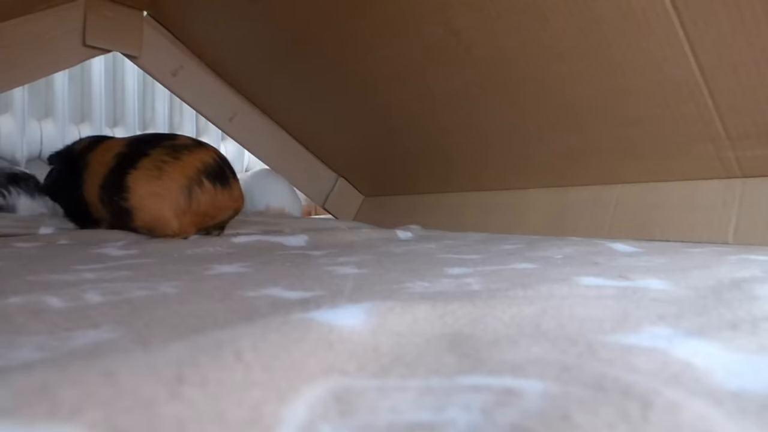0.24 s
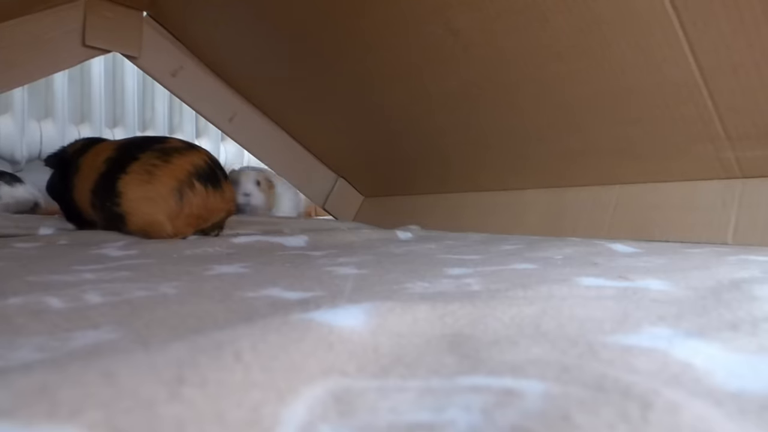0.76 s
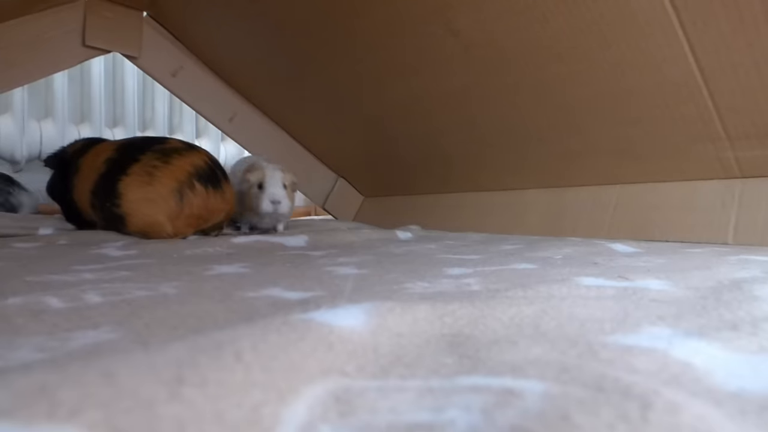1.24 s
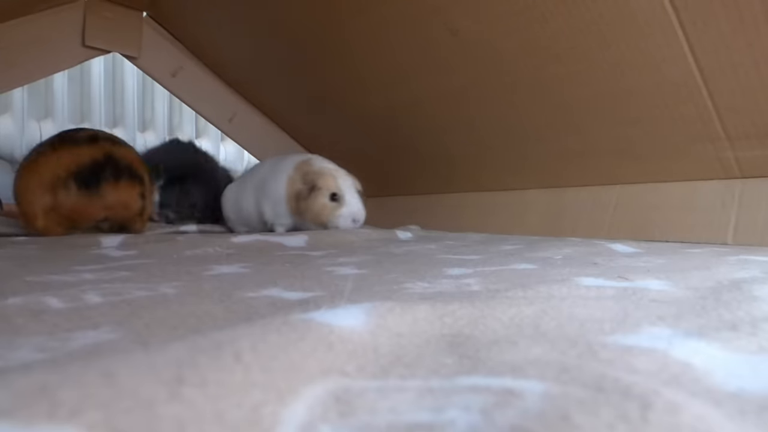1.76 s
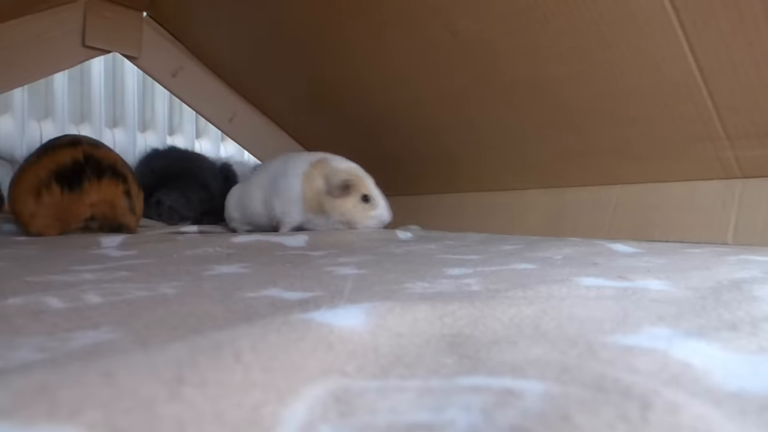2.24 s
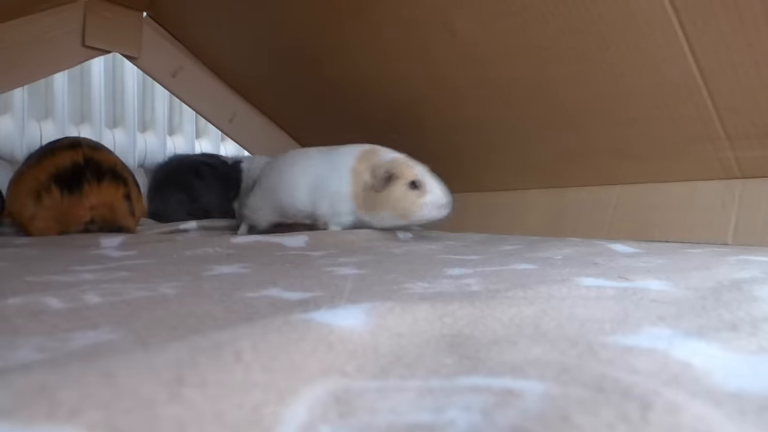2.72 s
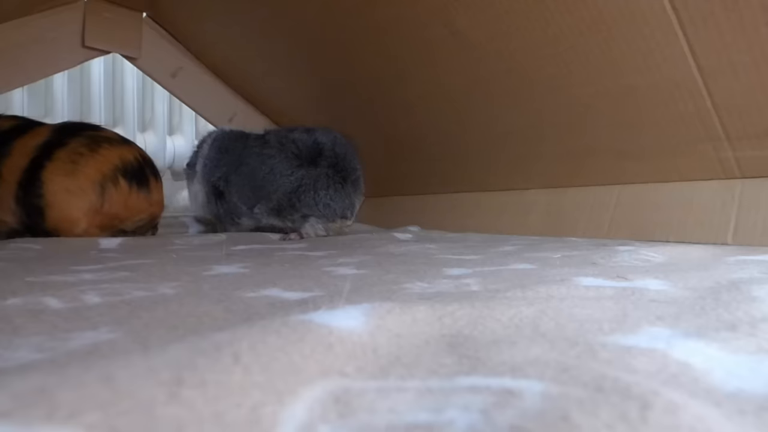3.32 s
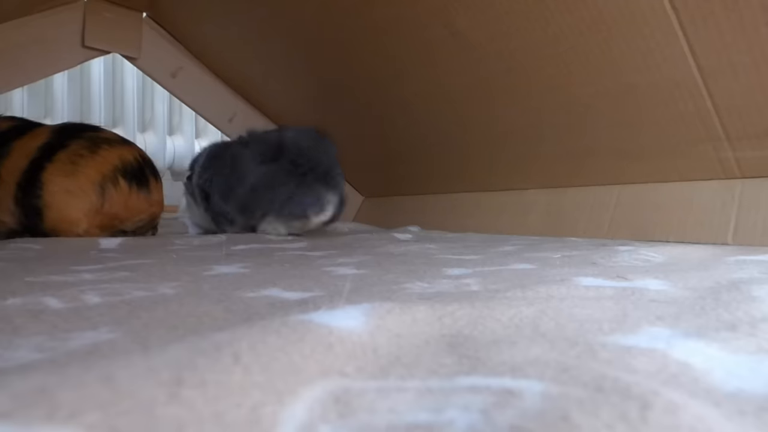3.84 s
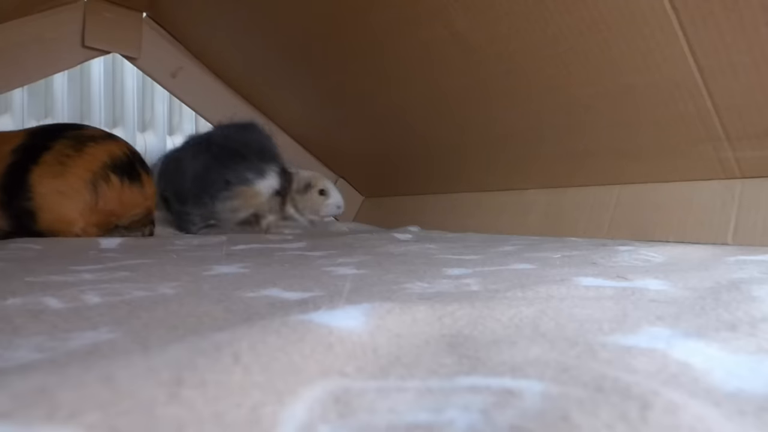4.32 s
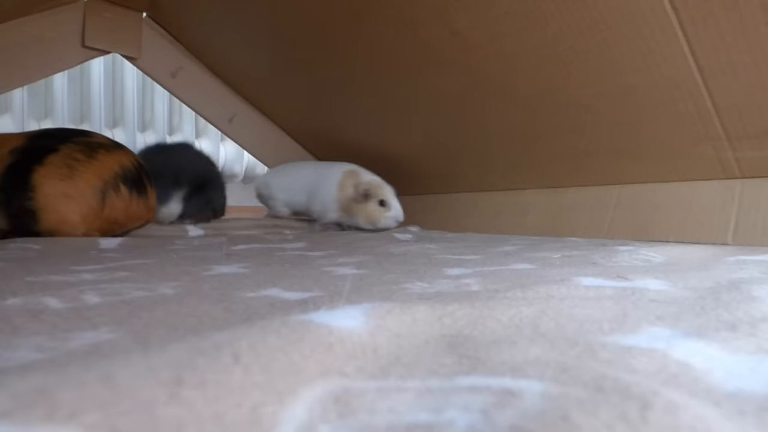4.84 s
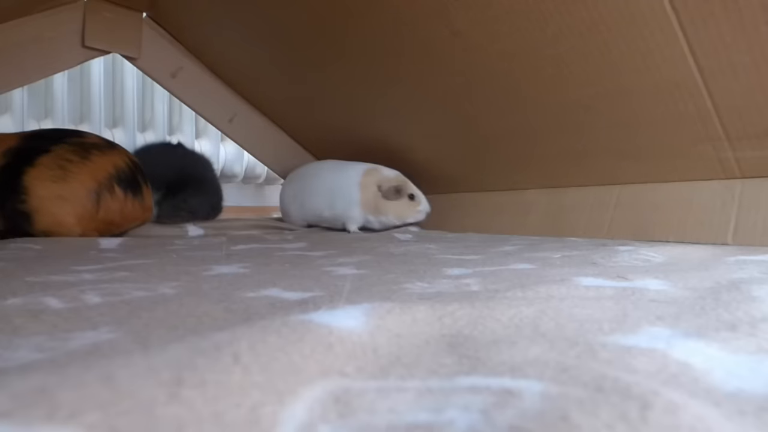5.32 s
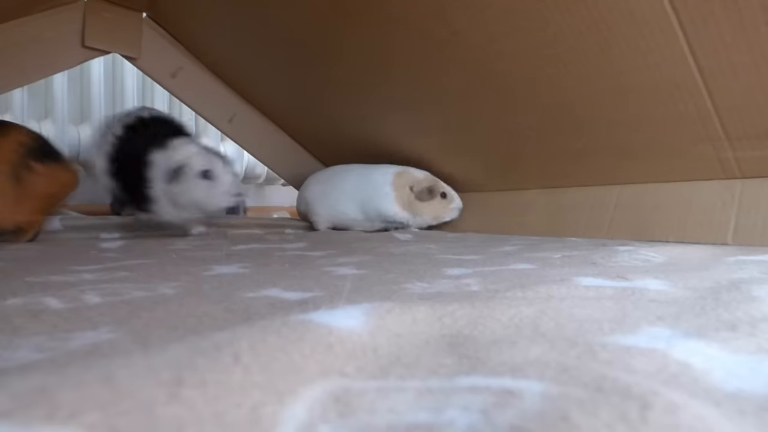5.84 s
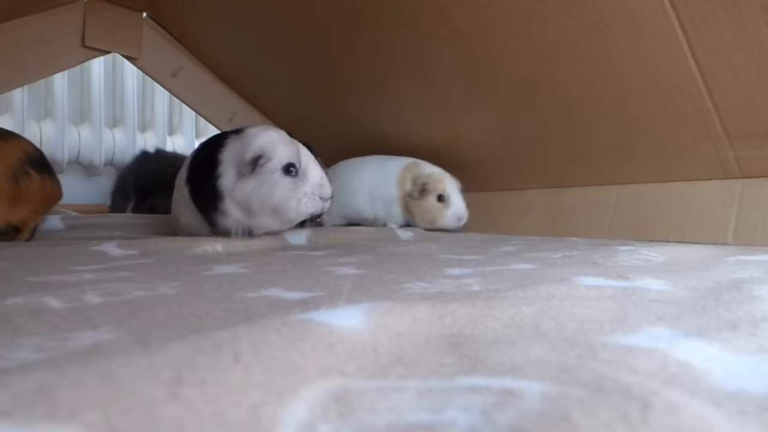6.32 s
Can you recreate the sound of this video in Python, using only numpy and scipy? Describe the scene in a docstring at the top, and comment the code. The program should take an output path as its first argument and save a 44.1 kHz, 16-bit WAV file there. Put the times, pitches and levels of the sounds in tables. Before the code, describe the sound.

Guinea pigs give low rumbling purrs and quick, soft rising clucks while fur brushes fleece and claws tick on cardboard in a small tunnel.

```python
"""Guinea pigs under a cardboard tunnel

A rumbling purr: trains of low throbs, about fifteen a second. Clucking chuts: a first note, then a rising flick.
Both are bent harmonic notes with half-pitch lines, rasp and air; they ring three low modes of the tunnel.
Shaped noise makes fur on fleece, scuffs, ticking claws and footfalls; sinking sines make knocks on the cardboard.
A small stereo microphone lies on the fleece; room hush and a thin electrical whine lie behind."""
import sys
import numpy as np
from scipy import signal
from scipy.io import wavfile
from scipy.ndimage import uniform_filter1d

SR = 44100
rng = np.random.default_rng(int(sys.argv[2]) if len(sys.argv) > 2 else 0)


def unload_audio(sound):
    """Save the sound as a 16-bit wav file, at the path given as the first command line argument."""
    columns = np.transpose(np.atleast_2d(sound))
    # keep every value between -1 and 1, then stretch to whole-number steps
    steps = np.round(np.clip(columns, -1, 1) * 32767)
    wavfile.write(sys.argv[1], SR, steps.astype(np.int16))


N = 289737  # samples

# Levels are those before the mix; spectra give relative density.
# purr throbs: t/s, level/dB
PURR_THROBS = [(0.01, -27), (0.075, -25), (0.148, -23), (0.221, -25), (0.286, -24), (0.846, -31.5),
               (0.904, -28), (0.957, -22), (1.014, -23), (1.082, -22), (1.148, -22), (1.214, -23.5),
               (1.282, -23.5), (1.356, -18), (1.426, -18), (1.499, -20), (1.582, -25.5), (1.646, -25),
               (1.723, -22.5), (1.811, -24), (1.89, -24.5), (1.97, -23.5), (2.038, -24), (2.1, -23.5),
               (2.169, -23), (2.237, -24.5), (2.301, -24.5), (2.376, -23), (2.449, -24), (2.539, -22),
               (3.202, -32), (3.263, -29), (3.326, -31), (3.388, -29), (3.453, -30), (3.516, -27.5),
               (3.585, -27), (3.653, -27.5), (3.718, -30.5), (3.785, -26.5), (3.853, -27.5), (3.917, -26),
               (3.98, -31), (4.043, -29), (4.118, -32), (4.179, -27.5), (4.243, -26.5), (4.312, -32),
               (4.375, -31), (4.499, -28.5), (4.607, -33), (4.682, -29.5), (4.74, -23.5), (4.79, -27.5),
               (4.847, -28.5), (4.888, -26), (4.977, -32), (5.453, -36), (5.568, -31.5), (5.626, -32),
               (5.692, -28.5), (5.751, -29.5), (5.819, -33), (5.898, -27.5), (5.945, -31.5), (5.986, -28.5),
               (6.056, -36), (6.104, -25.5), (6.165, -25.5), (6.238, -28), (6.295, -24), (6.357, -28),
               (6.4, -25.5), (6.418, -29), (6.487, -33.5), (6.551, -26)]
# purr voice, interpolated: t/s, f/Hz, length/ms, overtones/dB, pitch arch/octaves
PURR_VOICE = [(0.02, 272.5, 47, -19, 0.71), (0.15, 332, 31, -24, 0.72), (0.29, 315, 26.5, -12, 0.97),
              (0.85, 228, 10, -27, 0.99), (1.009, 308.5, 24.6, -25, 0.58), (1.22, 337, 32.6, -11.5, 1),
              (1.429, 264.5, 10.2, -12, 0.076), (1.65, 309.5, 26.2, -5, 0.64),
              (1.81, 270.6, 18.6, -18, 0.29), (2.17, 280.6, 22, -10.5, 0.8), (2.235, 317, 19.4, -7.5, 0.95),
              (2.38, 318, 28, -7.5, 0.74), (2.449, 266, 43.5, -4.5, 0.78), (2.6, 262, 21, -8, 0.13),
              (3.19, 225.4, 16.6, -4.5, 0.058), (3.6, 246, 20.5, -4.5, 0.04), (4.3, 242, 9.6, -6, 0.063),
              (4.5, 270, 18, -27, .05), (4.75, 256, 9.8, -15, .05), (5.05, 304, 12, -9, 0.05),
              (5.36, 302, 24, -3, .05), (5.46, 240, 16.5, -9.5, 0.06), (6.0, 253, 11, -10, .05),
              (6.12, 252, 15.3, -23, 0.14), (6.56, 231, 18.4, -17, .05)]
# the two purring animals: third harmonic re second/dB, swell exponent (small = sharp start)
PURRERS = [(-5, 0.5), (-14, 0.85)]
# first note and its flick: t/s, level/dB, f/Hz, glide/octaves, time to flick/ms, overtones/dB,
# third harmonic re second/dB, depth of strong-weak cycles, flick level/dB, flick f/Hz
CHUTS = [(.784, -32.5, 632, -0.5, 19.8, -5, -11, 1.7, -29, 892),
         (.975, -36.5, 548, -0.66, 18, 0, -20, 0.99, -36, 874),
         (1.257, -32, 608, 0.23, 21.6, -0.5, -11, 0.89, -32, 754),
         (1.466, -29, 634, 0.095, 20.4, -6.5, -0.5, .3, -28, 602),
         (1.677, -22, 539, -0.14, 17.4, -8.5, -5, 2.2, -24.5, 855),
         (1.756, -31, 717, -0.88, 17, -10, -22, 2.4, -24.5, 820),
         (2.37, -28, 642, -0.34, 17, -3.5, -34, 1.8, -32.5, 700),
         (2.543, -25, 675, -0.25, 26.7, -2, -15, 1.7, -27, 757),
         (2.74, -30, 660, -0.012, 26.8, 1.5, -8, 0.96, -29, 594),
         (2.937, -29, 633, -0.56, 22, 1.5, -11, 1.3, -31.5, 695),
         (3.2, -38.5, 578, -0.3, 24.6, -2, -8, 2.4, -35, 766),
         (3.389, -34, 571, -0.45, 30.5, -3, -10, 1.1, -37, 745),
         (3.475, -29.5, 644, -0.31, 27, -10.5, -7, 0.98, -37, 795),
         (3.755, -32.5, 573, -0.29, 19.5, -6, -11, 0.86, -31, 795),
         (3.949, -32, 587, -0.56, 21.2, -6.5, -13, 1.5, -28, 760),
         (4.026, -26, 681, -0.33, 25, -8, -4, 1.4, -26.5, 740),
         (4.21, -27.5, 642, -0.23, 25, -8, -0.5, 0.42, -30.5, 630),
         (4.405, -32, 632, -0.52, 25, 0, -7, 2.2, -35.5, 840),
         (4.499, -30.5, 593, -0.48, 17, -3, -8, 2.4, -34.5, 773),
         (4.694, -33.5, 545, -0.71, 21.5, -1.5, -21, 2.1, -35, 734),
         (4.881, -27.5, 626, -0.27, 23, -11, -17, 2.8, -34.5, 800),
         (5.051, -28.5, 605, -0.23, 22, -9.5, -19, 2.03, -28, 740),
         (5.274, -28, 581, -0.18, 21, -9, -17, 1.5, -29, 795),
         (5.355, -27, 650, -0.61, 23.4, -13, -2, 1.4, -28.5, 780),
         (5.548, -25, 654, -0.17, 22, -11, -6, 0.4, -41, 650),
         (5.964, -31, 592, -1.45, 12.9, -14, -10, 2, -32, 796),
         (6.037, -27.5, 652, -0.58, 16, -11, -22, 1.8, -24.5, 714),
         (6.07, -27, 695, -0.77, 24.2, -13, -24, 0.77, -29, 755),
         (6.225, -25, 581, -0.24, 21, -5.5, -14, 0.99, -29.5, 706),
         (6.395, -27.5, 620, -0.97, 21, -4.5, -16, 2.3, -27.5, 710),
         (6.486, -30, 545, -0.71, 14.7, -6, -12, 1.1, -32, 683)]
# flicks without a first note: t/s, level/dB, f/Hz
LONE_FLICKS = [(0.04, -28.5, 1103), (0.243, -29.5, 1076), (0.32, -23, 1057), (1.068, -34.5, 660),
               (3.692, -36.5, 770)]
# single clear notes, short or drawn out: t/s, level/dB, f/Hz, glide/octaves, length/ms, overtones/dB
SINGLE_NOTES = [(0.012, -32.5, 709, -0.04, 73, -4), (0.213, -31.5, 723, 0.1, 56, -5),
                (0.294, -29, 702, 0.08, 55, -7), (.472, -36, 740, 0.94, 18.7, -7),
                (.615, -38, 810, 0.19, 18, -16), (.649, -24.5, 886, 0.16, 12, -14),
                (1.509, -33, 560, 0.75, 11.3, -3.5), (1.707, -28, 940, 0.62, 9.1, -9),
                (1.671, -27.5, 697, -0.29, 7.2, -8), (3.673, -37.5, 505, -0.31, 11, -8),
                (5.096, -34, 601, 0.36, 15, -18), (5.18, -40.5, 667, 0.41, 31, -13),
                (5.793, -28, 641, 0.057, 34, -20), (5.822, -30, 815, 0.72, 26, -10),
                (5.894, -29, 724, 0.11, 29.4, -12.5), (6.154, -31, 637, 0.36, 21, -12),
                (6.284, -31.5, 616, -0.25, 25, -12), (6.3, -28, 760, -0.0051, 32.5, -12.5)]
# fur on fleece: t of maximum/s, level/dB, time to swell 10 dB/ms, share of fine hiss (0-1)
FUR_STROKES = [(0.104, -32, 68, 0.3), (0.289, -35.5, 126, 0.37), (0.441, -35, 75, 0.45),
               (0.52, -36.5, 81, 0.4), (0.607, -29, 48, .23), (0.683, -24, 92, 0.33),
               (1.026, -41.5, 131, 0.13), (1.272, -39, 41, 0), (1.438, -41, 84, 0.3),
               (1.68, -45.5, 140, 0.13), (2.277, -40, 9, 0.4), (2.415, -46.5, 173, 0.15),
               (3.628, -40, 32, 0.4), (4.19, -50, 200, 0.3), (4.734, -35, 30, 0.85), (4.87, -50, 221, 0.34),
               (5.285, -46, 31, 0), (5.375, -43.5, 88, 0.06), (5.622, -37, 47, 0), (5.725, -40.5, 76, 0.17),
               (5.949, -46.5, 56, 0), (6.143, -40, 47, 0.56)]
# fine strokes: f/Hz, level per Hz/dB
FINE_SPECTRUM = [(2500, -32), (8500, 2.5), (9300, 4), (10300, 3), (14000, -5.5), (16000, -28)]
# coarse strokes: f/Hz, level per Hz/dB
COARSE_SPECTRUM = [(90, -47), (250, 4.5), (1200, -1), (2800, -5), (4800, -1), (7000, -1), (9500, -1.5),
                   (13000, -6.5), (16000, -23)]
# steps felt through the floor: t/s, level/dB
FOOTFALLS = [(0.51, -37), (0.724, -37.5), (1.692, -38.5), (1.878, -33), (1.95, -34.5), (3.903, -41),
             (4.18, -42), (5.356, -36), (5.486, -39), (5.98, -45), (6.2, -46), (6.42, -54)]
# floor thump: f/Hz, level per Hz/dB
THUMP_SPECTRUM = [(55, -34), (100, -6), (170, -3), (500, -19), (1500, -51)]
# claws on cardboard: t/s, peak level/dB, band centre f/Hz
CLAW_TICKS = [(0.522, -23, 6000), (0.852, -28, 8500), (0.923, -24, 7750), (1.265, -22.5, 7900),
              (1.3721, -13.5, 4400), (2.2733, -25, 7600), (2.4082, -21, 8000), (2.8407, -32.5, 9900),
              (3.2658, -22, 6500), (3.344, -33, 1770), (3.416, -28.5, 5170), (3.9736, -21.5, 5000),
              (4.5245, -29, 6000), (4.806, -27.5, 7400), (5.273, -30, 8100), (5.3625, -13, 6500),
              (5.7275, -19, 7900)]
# feet on cardboard: t/s, starting level/dB, starting f/Hz
FOOT_KNOCKS = [(0.4997, -19, 894), (0.568, -35, 505), (0.597, -23.5, 387), (0.663, -30, 442),
               (0.751, -29, 295), (1.877, -26.5, 494), (1.944, -27.5, 407), (4.923, -35.5, 585)]
# soft coloured scuffs: t/s, length/s, level/dB, centre f/Hz, width/Hz
SCUFFS = [(0.067, 0.17, -39.5, 9400, 600), (0.58, 0.22, -36, 4920, 1200), (1.268, 0.24, -48.5, 4340, 900),
          (3.004, 0.14, -46, 1190, 890), (3.007, 0.062, -43.5, 7100, 2600), (3.012, 0.12, -61, 4190, 90),
          (5.59, 0.085, -48, 3200, 900)]
# tunnel air modes: f/Hz, width/Hz, level/dB
TUNNEL_MODES = [(262, 34, 3.5), (337, 36, 0), (703, 110, -5)]
# dense reflections: f/Hz, t60/s
TAIL_T60 = [(200, 0.42), (1500, 0.1), (8000, 0.055)]
# room hush: f/Hz, level per Hz/dB
HUSH_SPECTRUM = [(20, 4.5), (34, -15), (65, -6), (250, -0.5), (1190, -7.5), (2200, -16), (4060, -23),
                 (10500, -29.5), (16000, -27)]
# left-right likeness: f/Hz, likeness (0-1)
LIKENESS = [(60, 1), (400, 0.98), (900, 0.2), (3000, 0.49), (8000, 0.68), (14000, 0.45)]
# stereo lean: f/Hz, left re right/dB
STEREO_LEAN = [(400, 2), (2500, 1.5), (12000, 1)]

TAKEOVER_S, PURR_WOBBLE, CHUT_WOBBLE = 3.1, 0.045, 0.033  # wobble: rms share of pitch
SINK_OCTAVES, SINK_PER_ARCH = 0.18, -0.04  # flat throbs sink more than arched ones
RASP_RATIO = 0.75  # rasp centre and width re nominal pitch
PURR_MOUTH, CHUT_MOUTH = (730, 160, 0.07), (1950, 1100, 0.04)  # air puffs: f/Hz, width/Hz, share
FIRST_SHARE = 0.88  # first note's part of the time to the flick
GLIDE_LATE = 1.98  # exponent; first notes bend late
FLICK_MS, FLICK_OCTAVES, FLICK_UNEVEN = 11.48, 0.72, 1
FLICK_DULLER_DB = -6.5  # overtones re first note
LONE_OCTAVES, LONE_OVERTONE_DB = 1, -50
THIRD_DB, THIRD_DB_PER_MS = -8, -0.451  # single notes: third harmonic weaker the longer the note
SINGLE_UNEVEN = 0.32
FADE_RATIO = 0.75  # stroke fading time re swelling time
STIR_DB, STIR_FINE = -52.5, 0.14  # constant stirring; fine share
KNOCK_T60_S, KNOCK_SINK_S, KNOCK_LOW_HZ = 0.083, 0.0067, 188
HUSH_DB, ELECTRIC_DB, ELECTRIC_HZ = -48.5, -72, 15625
OFFSET, EDGE_HZ = -0.0179, 16100


def gain_of(db):
    """Decibels to an amplitude factor."""
    return 10 ** (np.asarray(db) / 20)


def evened(x):
    """Scales to rms 1."""
    return x / np.sqrt(np.mean(x ** 2) + 1e-20)


def read(points, hz):
    """Interpolates a table on a log-frequency axis."""
    f, value = np.transpose(points)
    return np.interp(np.log(hz + 1), np.log(f + 1), value)


def likeness(hz):
    """Left-right likeness as a column over frequency."""
    return np.clip(read(LIKENESS, hz), 0, 1)[:, None]


def add(mix, s, sound):
    """Mixes a sound in at time s."""
    part = mix[round(s * SR):][:len(sound)]
    part += sound[:len(part)]


def resonate(x, hz, width_hz):
    """Damped resonance: one complex pole, gain about 1 at its centre."""
    r = np.exp(-np.pi * abs(width_hz) / SR)
    pole = r * np.exp(2j * np.pi * hz / SR)
    return 2 * signal.lfilter([1 - r], [1, -pole], x).real


def noise(colour, patchy_db, size):
    """Stereo noise from random short-time spectra whose level drifts in patches."""
    hop = size // 4
    hz = np.fft.rfftfreq(size, 1 / SR)
    a, b, c, d, patches = rng.standard_normal((N // hop + 5, len(hz), 5)).T
    patches = uniform_filter1d(patches, size=9, axis=0)
    patches = evened(uniform_filter1d(patches, size=9, axis=1))
    same = likeness(hz)
    left = a + 1j * b
    right = same * left + np.sqrt(1 - same ** 2) * (c + 1j * d)
    lean_db = np.multiply.outer([0.5, -0.5], read(STEREO_LEAN, hz))[..., None]
    level_db = read(colour, hz)[:, None] + patchy_db * patches + lean_db
    spectra = np.array([left, right]) * gain_of(level_db)
    return evened(signal.istft(spectra, nperseg=size, noverlap=size - hop)[1][:, :N])


def purr():
    """Rumble: a train of low vocal throbs, each arching up in pitch and sinking."""
    out = np.zeros(N)
    when, *voice = np.transpose(PURR_VOICE)
    for s, db in PURR_THROBS:
        hz, ms, overtone_db, arch = (np.interp(s, when, c) for c in voice)
        third_db, peak = PURRERS[int(s > TAKEOVER_S)]
        # throbs vary in brightness and pitch
        overtone_db += 4 * rng.standard_normal()
        hz *= 1 + 0.025 * rng.standard_normal()
        fall = SINK_OCTAVES + SINK_PER_ARCH * arch

        def bend(u):
            return arch * (np.sin(np.pi * u) - 0.8) - fall * (u - 0.5)

        add(out, s, call(db, hz, ms, bend, overtone_db, third_db, rough=PURR_WOBBLE,
                         half=0.4, peak=peak, flat=0.72, mouth=PURR_MOUTH))
    return out


def chuts():
    """Clucks, flicks and single notes: vocal notes gliding in pitch, their cycles growing uneven."""
    notes = []
    for s, db, hz, glide, ms, over_db, third_db, half, flick_db, flick_hz in CHUTS:
        notes.append((s, db, hz, glide, FIRST_SHARE * ms, over_db, third_db, half, GLIDE_LATE))
        notes.append((s + ms / 1000, flick_db, flick_hz, FLICK_OCTAVES, FLICK_MS,
                      over_db + FLICK_DULLER_DB, third_db, FLICK_UNEVEN, 1))
    for row in LONE_FLICKS:
        notes.append((*row, LONE_OCTAVES, FLICK_MS, LONE_OVERTONE_DB, THIRD_DB, FLICK_UNEVEN, 1))
    for row in SINGLE_NOTES:
        third_db = THIRD_DB + THIRD_DB_PER_MS * row[4]
        notes.append((*row, third_db, SINGLE_UNEVEN, 1))

    out = np.zeros(N)
    for s, db, hz, glide, ms, overtone_db, third_db, half, late in notes:
        def bend(u):
            return glide * (u ** late - 0.5 ** late)

        add(out, s, call(db, hz, ms, bend, overtone_db, third_db, rough=CHUT_WOBBLE,
                         half=half, peak=0.71, flat=0.36, mouth=CHUT_MOUTH))
    # the closed mouth damps the highest overtones
    return signal.lfilter(*signal.butter(4, 2500, fs=SR), out)


def call(db, hz, ms, bend, overtone_db, third_db, rough, half, peak, flat, mouth):
    """One vocal-fold note, bent by bend(u) octaves; strong-weak cycles add half-pitch lines and rasp."""
    u = np.linspace(0, 1, round(max(ms, 5) * SR / 1000))
    shake, air = rng.standard_normal((2, 3500))
    shake = evened(uniform_filter1d(shake, size=60))[:len(u)]
    pitch_hz = hz * 2 ** bend(u) * (1 + rough * shake)
    phase = 2 * np.pi * np.cumsum(pitch_hz) / SR
    upper = np.cos(2 * phase) + gain_of(third_db) * (np.cos(3 * phase) + 0.4 * np.cos(4 * phase))
    # the throat closes, so overtones fade
    folds = np.cos(phase) + gain_of(overtone_db - 0.11 * ms * u) * upper

    puffs = (1 + np.cos(phase / 2)) ** 2  # one every second cycle
    rasp = evened(resonate(air, RASP_RATIO * hz, RASP_RATIO * hz))[:len(u)] * puffs
    mouth_hz, width_hz, share = mouth
    breath = resonate(resonate(air[::-1], mouth_hz, width_hz), mouth_hz, width_hz)
    grit = evened(breath)[:len(u)] * puffs

    uneven = half * u ** (2.2 / max(half, 0.5))  # grows to the end, sooner when deep
    voiced = folds * (1 + uneven * np.sin(phase / 2))
    airy = 0.062 * uneven * rasp + share * (0.5 + uneven) * grit
    swell = abs(np.sin(np.pi * u ** peak)) ** flat
    return gain_of(db) * (voiced + airy) * swell


def bodies():
    """Fur brushes fleece in fine grains of noise; steps and dragging bodies shake the floor."""
    t = np.arange(N) / SR
    brushing, fine = stroking(t)
    fibres = gain_of(3.23 * rng.exponential(1, N)) * (rng.random(N) < 900 / SR)
    grain = evened(1 + 0.035 * signal.oaconvolve(fibres, np.exp(-t[:400] / 0.0073))[:N])
    steps = gain_of(-56 + 5.0 * rng.random(N)) * (rng.random(N) < 12 / SR)  # light patter, 12/s
    for s, db in FOOTFALLS:
        add(steps, s, gain_of([db]))
    push = t[:5000] / 0.016
    push = push * np.exp(1 - push)  # peaks at 16 ms
    weight = signal.oaconvolve(steps, push)[:N] + 0.29 * brushing
    fine_hiss = noise(FINE_SPECTRUM, patchy_db=2.8, size=256)
    coarse_drag = noise(COARSE_SPECTRUM, patchy_db=2.8, size=256)
    strokes = np.sqrt(fine) * fine_hiss + np.sqrt(1 - fine) * coarse_drag
    return brushing * grain * strokes + weight * noise(THUMP_SPECTRUM, patchy_db=1.0, size=2048)


def stroking(t):
    """Strokes swell and fade in dB around a rounded top; returns strength and share of fine hiss."""
    power = np.full(len(t), gain_of(2 * STIR_DB))
    hiss = STIR_FINE * power
    for s, db, ms, fine in FUR_STROKES:
        away_ms = 1000 * np.maximum(s - t, (t - s) / FADE_RATIO)
        part = gain_of(2 * (db - 10 * (away_ms / ms) ** 1.18))
        power = power + part
        hiss = hiss + fine * part
    return np.sqrt(power), np.clip(hiss / power, 0, 1)


def claws():
    """Ticks: noise bursts a few ms long, strongest in one broad band."""
    out, t = np.zeros(N), np.arange(1300) / SR
    for s, db, hz in CLAW_TICKS:
        envelope = gain_of(-60 * t / 0.02) * np.minimum(t / 0.00041, 1)
        snap = rng.standard_normal(len(t)) * envelope
        snap = resonate(resonate(snap, hz, 3260), hz, 17000)
        add(out, s, gain_of(db) * snap / abs(snap).max())
    return out


def knocks():
    """Feet ring the cardboard: a sudden tone, rough in pitch, sinks to the sheet's low mode and dies."""
    out, t = np.zeros(N), np.arange(3000) / SR
    for s, db, start_hz in FOOT_KNOCKS:
        hz = KNOCK_LOW_HZ + (start_hz - KNOCK_LOW_HZ) * np.exp(-t / KNOCK_SINK_S)
        rough = 1 + 0.39 * evened(uniform_filter1d(rng.standard_normal(len(t)), size=50))
        tone = np.sin(2 * np.pi * np.cumsum(hz * rough) / SR)
        add(out, s, gain_of(db - 60 * t / KNOCK_T60_S) * tone)
    return out


def scuff():
    """Noise in one resonance, swelling quickly and dying slowly."""
    out = np.zeros(N)
    for s, length_s, db, hz, width_hz in SCUFFS:
        u = np.linspace(0, 1, round(length_s * SR))
        air = resonate(resonate(rng.standard_normal(SR // 2), hz, width_hz), hz, width_hz)
        add(out, s, gain_of(db) * evened(air)[:len(u)] * np.sin(np.pi * u ** 0.42))
    return out


def tail(x):
    """Dense reflections: sparse taps of random sign, dying faster in the treble."""
    taps = np.zeros((2, SR // 2))
    at = np.arange(80, SR // 2 - 20, 20)
    at = at + rng.integers(0, 20, (2, len(at)))
    signs = rng.choice([-1., 1.], at.shape)
    np.put_along_axis(taps, at, signs, 1)
    hz, t, z = signal.stft(taps, SR, nperseg=512)
    same = likeness(hz) ** 2  # long waves reach both ports alike
    z[1] = same * z[0] + np.sqrt(1 - same ** 2) * z[1]
    decay = gain_of(-60 * t / read(TAIL_T60, hz)[:, None])
    fading = signal.istft(z * decay, SR, nperseg=512)[1]
    return signal.oaconvolve(x[None], fading / np.linalg.norm(fading[0]), axes=1)[:, :N]


def electric_whine():
    """Thin electrical whine: one steady sine."""
    return gain_of(ELECTRIC_DB) * np.sin(2 * np.pi * ELECTRIC_HZ * np.arange(N) / SR)


def scene():
    """Voices ring the tunnel; movement, reflections, room hush and electrical whine join them."""
    low, high, ticks, bumps = purr(), chuts(), claws(), knocks()
    ring = sum(gain_of(db) * resonate(low + high, hz, width_hz) for hz, width_hz, db in TUNNEL_MODES)
    # chuts come from the side: one port hears them a little weaker, with a faint repeat 12 samples later
    repeat = np.roll(high, shift=12)
    side = np.array([high, 0.89 * high + 0.33 * repeat])
    scratches = (ticks + scuff()) * gain_of([[1.2], [-1.2]])
    near = gain_of(-5) * low + bumps + ring + side + scratches
    wet = tail(gain_of(-11) * low + gain_of(-9.0) * bumps + gain_of(-8.5) * high + gain_of(-4.0) * ticks)
    # little deep bass: everything near falls away below 70 Hz
    no_bass = signal.butter(4, 70, "high", fs=SR, output="sos")
    near = signal.sosfilt(no_bass, near + wet + bodies())
    hush = gain_of(HUSH_DB) * noise(HUSH_SPECTRUM, patchy_db=3.5, size=1024)
    return near + hush + electric_whine()


def record(dry):
    """Band limit, plus a small steady offset of the converter."""
    band = signal.firwin(511, EDGE_HZ, window=("kaiser", 9), fs=SR)
    return OFFSET + signal.oaconvolve(dry, band[None], "same")


dry = scene()
out = record(dry)
unload_audio(out)
```